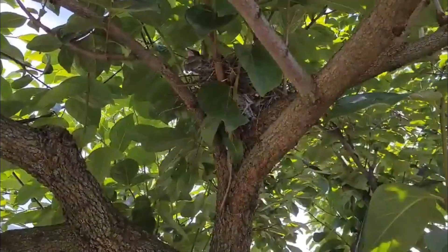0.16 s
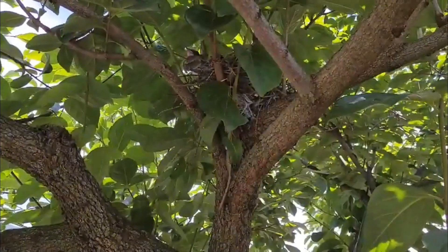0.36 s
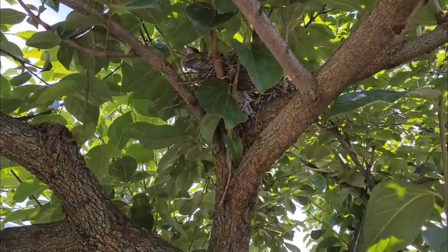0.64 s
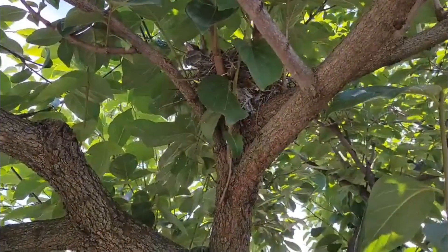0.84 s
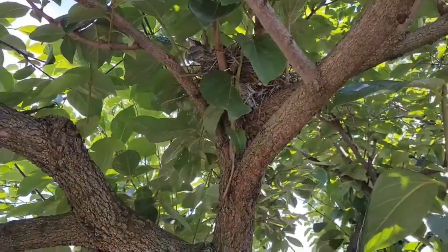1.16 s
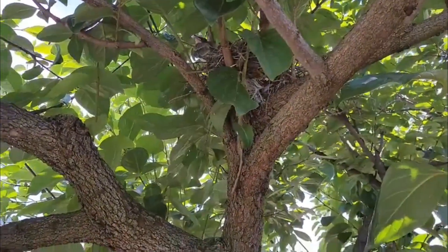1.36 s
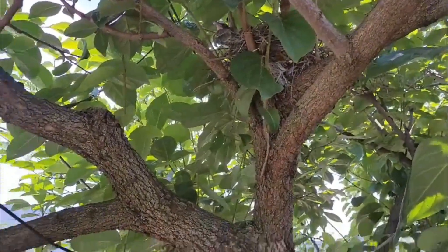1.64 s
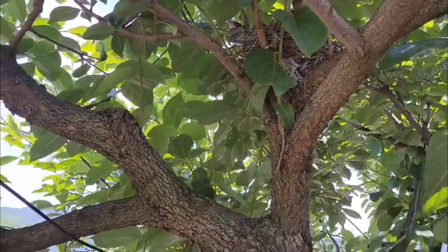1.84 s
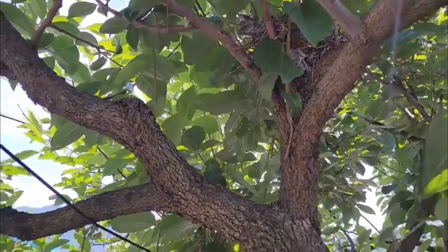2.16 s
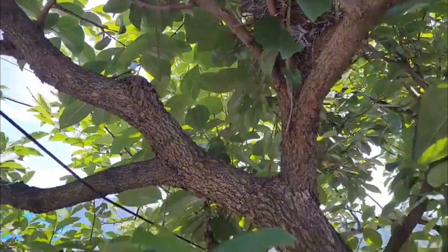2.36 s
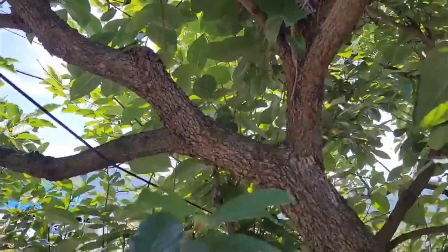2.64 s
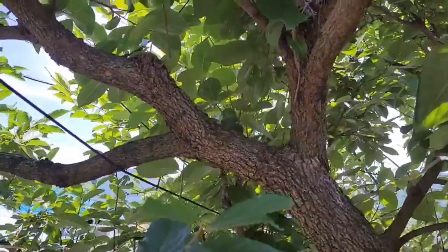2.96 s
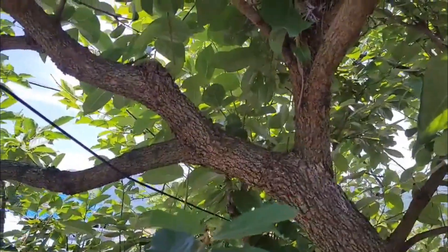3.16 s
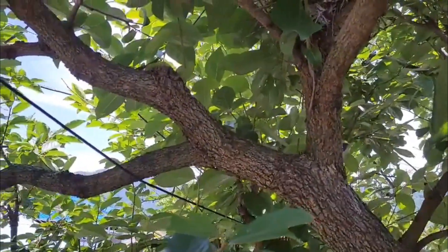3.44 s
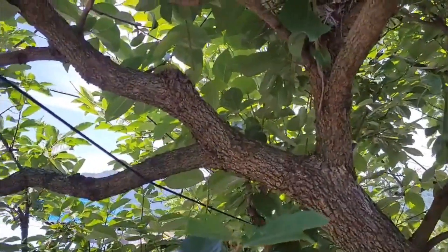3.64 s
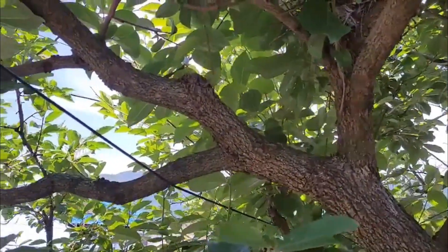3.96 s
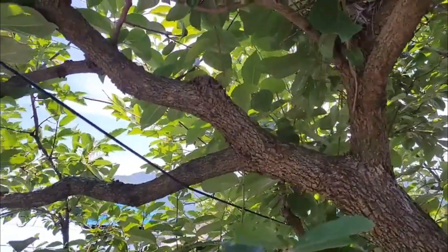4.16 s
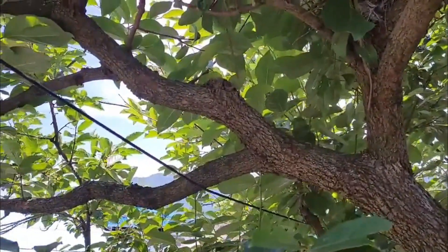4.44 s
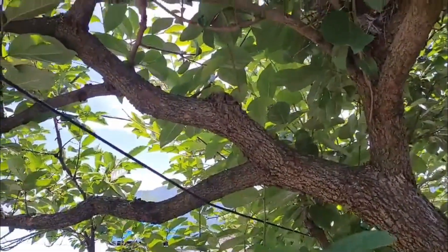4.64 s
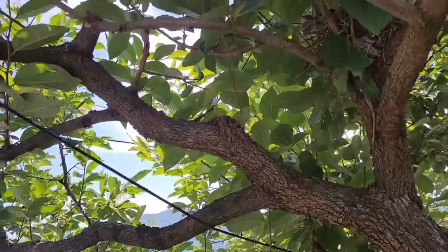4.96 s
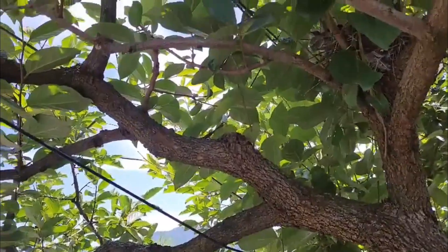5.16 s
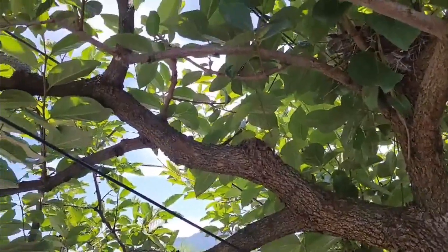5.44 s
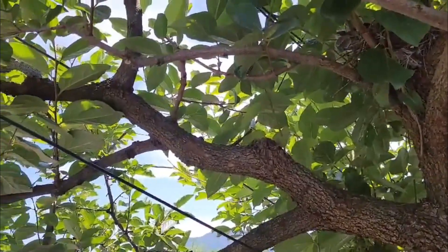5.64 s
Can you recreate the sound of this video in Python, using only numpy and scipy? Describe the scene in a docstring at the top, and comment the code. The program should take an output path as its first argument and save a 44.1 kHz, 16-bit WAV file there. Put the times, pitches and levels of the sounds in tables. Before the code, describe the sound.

A bird close by in a leafy tree gives two loud, harsh, squealing rasps, with faint insect hiss and small rustles behind.

```python
"""In a leafy tree, close by, a shrike gives two long, harsh rasps; the second comes in two pushes.
Each push is turbulent noise chopped into rapid puffs and rung by the throat: it snaps on, holds and fades,
and sliding narrow resonances make it squeal briefly. Delayed copies echo it from twigs and foliage.
Behind it are a steady insect hiss and a thin drone, both filtered noise, and faint chirps of gliding sines.
Shaped noise gives the low outdoor rumble, rustles, small ticks, rubs and handling bumps."""
import sys
import numpy as np
from scipy import signal
from scipy.fft import rfft, irfft, next_fast_len
from scipy.io import wavfile

SR = 44100
rng = np.random.default_rng(int(sys.argv[2]) if len(sys.argv) > 2 else 0)


def unload_wav(signal):
    """Save mono or channel-first audio to the path in sys.argv[1] as 16-bit WAV at rate SR, clipped to [-1, 1]."""
    wavfile.write(
        sys.argv[1],
        SR,
        np.round(np.clip(np.atleast_2d(signal).T, -1, 1) * 32767).astype(np.int16),
    )


N = 256203
TIME = np.arange(N) / SR  # t/s

# Spectra give relative level per Hz; pans give left minus right; likeness is the share of the left
# channel blended into the right (-1 to 1). Layer levels are nominal: later gains and shaping add to them.

# pushes of air: start t/s, length t/s, effort level/dB, swell rate/(dB/s), initial puff rate f/Hz
PUSHES = [(-.06, 0.91, -27.5, -1, 111), (2.387, 0.59, -27.5, 3.5, 107), (2.906, 0.42, -26, -7, 108)]
# spectra of the rasp's body, treble and low rattle: f/Hz, level/dB
BODY_SPECTRUM = [(1200, -70), (1700, -20.5), (2100, -6.5), (2600, -2), (3100, 1), (3800, 1), (4400, -1.5),
                 (4950, -4), (5400, -12), (6500, -62)]
TREBLE_SPECTRUM = [(4500, -47), (5400, 2), (6300, 1.5), (7200, 1.5), (8300, 0.5), (9300, 0.5),
                   (10200, -2.5), (11200, -0.5), (12200, 1), (13300, -2), (14300, -3), (15300, -18)]
RATTLE_SPECTRUM = [(500, -13), (750, -13), (930, -7), (1100, -6), (1230, -9), (1500, -3.5), (1750, -2),
                   (2300, -3.5)]
# fixed resonances of throat and beak: f/Hz, width f/Hz, lift level/dB
BEAK_RESONANCES = [(3100, 110, 1.5), (3390, 170, 1.5), (3620, 140, -2), (3870, 150, 2), (4910, 160, 2)]
# depth to which the puffs chop the air: t/s, depth/1 (0 to 1)
PUFF_DEPTH = [(.08, .38), (.16, .1), (.23, .3), (.31, .14), (.44, .18), (.57, .38), (.7, .1), (2.42, .18),
              (2.48, .38), (2.6, .48), (2.7, .24), (2.81, .38), (3.02, .08), (3.13, .28), (3.24, .08)]
# level curves of treble and low rattle: t/s, level/dB
TREBLE_LEVEL = [(0, -33), (.08, -31), (.35, -30.5), (.48, -31.5), (.55, -32), (.76, -35.5), (2.4, -28.5),
                (2.56, -31.5), (2.65, -28), (2.73, -31.5), (2.82, -28.5), (2.89, -32), (2.95, -29),
                (3.07, -29), (3.16, -31), (3.25, -34.5)]
RATTLE_LEVEL = [(0, -49), (.18, -49), (.5, -42.5), (.66, -43), (.78, -40), (2.4, -43.5), (2.7, -44),
                (2.87, -44), (2.94, -41.5), (3.02, -48.5), (3.25, -46.5)]
# the throat's main and upper moving resonances, one curve a rasp: t/s, f/Hz
THROAT_CURVES = [
    [(.08, 3700), (.33, 3250), (.52, 3870), (.61, 3140), (.756, 4260), (.8, 3400)],
    [(2.4, 3200), (2.54, 2980), (2.7, 3470), (2.884, 3970), (2.922, 2920), (2.98, 3600), (3.28, 3630)],
]
UPPER_CURVES = [
    [(.05, 8000), (.21, 8400), (.35, 8000), (.65, 8550)],
    [(2.42, 7900), (2.63, 8300), (2.72, 9200), (2.84, 9600), (2.95, 7100), (3.08, 7860), (3.25, 7760)],
]
# squeals: start t/s, length t/s, start f/Hz, end f/Hz, width f/Hz, level/dB, pan level/dB
SQUEAL_EVENTS = [(0, 0.14, 3800, 3900, 170, -26.5, -17), (-.03, 0.14, 4320, 4500, 200, -30.5, -6),
                 (0.102, 0.067, 4600, 4450, 200, -29.5, -2), (.14, .06, 1600, 1590, 140, -61, 0),
                 (0.188, 0.22, 3120, 3420, 250, -45, -6), (0.3, 0.11, 2390, 2330, 200, -34, 1),
                 (0.309, 0.074, 7500, 7700, 900, -36, 1), (0.336, 0.083, 4970, 4800, 220, -31, -8),
                 (0.493, 0.094, 3920, 3730, 300, -28.5, 0), (0.497, 0.11, 4530, 4150, 350, -30.5, 1),
                 (0.548, 0.081, 3000, 2960, 150, -29.5, -6), (0.693, 0.064, 4300, 4400, 300, -35, 2),
                 (2.387, 0.042, 3400, 3620, 450, -28.5, 2), (2.393, 0.036, 2950, 2760, 200, -32.5, 2),
                 (2.432, 0.22, 2850, 3150, 170, -32, 1), (2.433, 0.28, 8330, 8360, 260, -36.5, -8),
                 (2.394, .18, 7150, 7240, 300, -42, 6), (2.604, 0.23, 3270, 3320, 170, -28.5, 8),
                 (2.612, 0.26, 3850, 4150, 170, -30, 2), (2.645, 0.17, 4400, 4570, 400, -33.5, 4),
                 (2.659, 0.2, 9050, 9600, 1200, -38, 0), (2.783, 0.066, 3380, 3430, 220, -22.5, 4),
                 (2.786, 0.07, 6950, 6730, 500, -33.5, -1), (2.837, 0.048, 4750, 5000, 300, -28, -2),
                 (2.908, 0.067, 2600, 2730, 300, -28, 3), (2.887, 0.057, 2220, 2310, 300, -36.5, 7),
                 (2.925, 0.049, 3370, 3570, 200, -29.5, -10), (3.051, 0.038, 1500, 1560, 160, -54, -2),
                 (3.166, 0.054, 1710, 1680, 200, -48, 7), (3.241, 0.038, 4860, 4900, 220, -37, 0)]
# low ring under the rasps: start t/s, length t/s, level/dB
HOLLOW_RINGS = [(.7, .14, -51), (2.33, 0.9, -51.5)]
# stereo image of the bird: f/Hz, pan level/dB; then f/Hz, likeness/1
BIRD_LEAN = [(800, 0.5), (2400, 0.5), (3400, 1.5), (4200, 1), (5200, 3), (7500, -0.5), (8400, -2.5),
             (9500, -4), (11000, 1.5), (15000, -1)]
BIRD_LIKENESS = [(500, 0.19), (1000, 0.73), (1500, 0.051), (2100, 0.29), (3500, 0), (5000, 0.038),
                 (15000, 0)]
# far chirps of another bird: start t/s, length t/s, start f/Hz, end f/Hz, bow f/Hz, level/dB
CHIRP_EVENTS = [(3.352, .045, 4080, 3620, 0, -50), (3.404, .03, 4600, 5100, 0, -47),
                (3.425, 0.035, 5350, 5880, 80, -48), (3.52, 0.046, 4080, 4420, 60, -55),
                (4.19, .11, 3850, 4270, 380, -50)]
# insect hiss: spectrum f/Hz, level/dB; level curve t/s, level/dB; stereo image f/Hz, pan level/dB
HISS_SPECTRUM = [(1800, -92), (2700, -29.5), (3100, -8), (4200, -3.5), (5000, -5), (6600, -3.5),
                 (7700, 2.5), (8600, -2), (10000, -8.5), (12000, -15.5), (13500, -23), (15200, -37)]
HISS_LEVEL = [(0, -42.5), (1.1, -45.5), (2.3, -45), (3.5, -47), (4.3, -47), (4.6, -45.5)]
HISS_LEAN = [(2500, 2), (4200, 5), (6500, 4), (7600, 4.5), (8500, -4.5), (10000, 0.5), (12000, 3.5),
             (14000, 6)]
# one insect's thin note: t/s, level/dB
DRONE_LEVEL = [(1.4, -53.5), (2.1, -60), (3.5, -72), (5.81, -84)]
# outdoor rumble: spectrum f/Hz, level/dB; swells start t/s, length t/s, level/dB
AIR_SPECTRUM = [(12, -50), (20, -31), (54, 1), (145, -2), (235, 2), (338, -1.5), (584, -6), (807, -10),
                (929, -12), (1090, -15.5), (2040, -21), (2500, -20), (3250, -40), (5500, -120)]
AIR_GUSTS = [(.02, 0.24, -65.5), (.62, 0.15, -56.5), (.88, 0.093, -67), (1.7, 0.14, -65), (5.42, 0.31, -71)]
# stereo image of the surroundings: f/Hz, pan level/dB; then f/Hz, likeness/1
AIR_LEAN = [(30, 17), (70, 6), (140, 2), (1000, 0.5), (2500, 3.5)]
AIR_LIKENESS = [(30, 0.91), (80, 0.23), (220, 0.94), (500, 0.6), (900, -0.12), (1500, -0.13), (2200, 0.085)]
# small ticks and scuffs close by: start t/s, scuff level/dB, scuff decay by 60 dB t/s
TICK_EVENTS = [(2.042, -51, 0.091), (2.164, -44.5, 0.079), (3.369, -53, 0.14), (3.702, -43.5, 0.066),
               (4.264, -60, 0.055), (4.302, -55, 0.056), (4.342, -59, .06), (4.419, -48, .025),
               (5.087, -47, 0.085), (5.156, -52, .03), (5.454, -50.5, 0.062), (5.478, -55, .05),
               (5.55, -61, .06), (5.595, -58, .07)]
# spectrum shared by ticks and leaves: f/Hz, level/dB
TICK_SPECTRUM = [(150, -1), (400, 5.5), (900, 1.5), (1500, -1.5), (2200, 3), (3200, 10), (6000, -24),
                 (12000, -37)]
# soft rustles of leaves, dull rubs and handling bumps: start t/s, length t/s, level/dB
RUSTLE_EVENTS = [(.83, 0.24, -58), (1.74, 0.22, -64), (2.1, 0.16, -65), (3.33, 0.092, -56),
                 (4.67, 0.12, -63), (5.5, 0.15, -59)]
RUB_EVENTS = [(.87, 0.16, -61.5), (1.7, 0.34, -62.5), (4.24, 0.16, -70), (5.4, 0.2, -74)]
BUMP_EVENTS = [(0.886, 0.13, -63), (2.01, 0.27, -61.5), (2.494, 0.14, -56.5), (3.72, 0.084, -59.5),
               (4.257, 0.2, -53.5), (4.9, 0.13, -63)]
# spectrum of the bumps: f/Hz, level/dB
BUMP_SPECTRUM = [(25, -30), (50, 11), (75, 13), (110, 0), (250, -7.5), (600, -26)]

ATTACK_S, RELEASE_S = 0.023, 0.087
SNAP_S, SNAP_DB = 0.016, 0.5  # accent at the start of each push
SAG_HZ_PER_S = 6  # the puffs slow as the air runs out
RATE_WANDER, UNSTEADY_HZ = 0.0063, 8  # the puff rate wavers slightly
THROAT_FIRM, SQUEAL_FIRM = .5, .7  # 0 to 1
HOLLOW_HZ, HOLLOW_WIDTH_HZ = 998, 180
DRONE_HZ = 4175
AIR_DB, AIR_WANDER_DB, AIR_WANDER_HZ = -61, 1.5, 3.5
RUB_HZ, RUB_WIDTH_HZ = 485, 280
CRACK_DB, CRACK_T60_S = 4, 0.0094  # crack above scuff, and its decay
EDGE_HZ = 15450


def shrike(body_db=1.06, focus=0.5, throat_width_hz=700,
           upper_focus=0.36, upper_width_hz=1100, treble_pulsing=0.31):
    """Source-filter voice: pulsed turbulent air excites fixed and moving resonances of throat and beak."""
    knots_db, rattle_knots_db, knot_hz, knot_s = 2.3, 3.6, 200, .018
    effort, bright, low, flow = rasp_controls()
    throat_hz, = curves(np.vstack(THROAT_CURVES))
    upper_hz, = curves(np.vstack(UPPER_CURVES))

    body = colour(flow * noise(), BODY_SPECTRUM, BEAK_RESONANCES)
    body = body + focus * flow * resonate(noise(), throat_hz, throat_width_hz, THROAT_FIRM)
    treble = colour(flow ** treble_pulsing * noise(), TREBLE_SPECTRUM)  # pulses less deeply
    treble = treble + upper_focus * resonate(flow * noise(), upper_hz, upper_width_hz)
    rattle = colour(flow * noise(), RATTLE_SPECTRUM)

    voice = gain_of(body_db) * effort * patchy(body, knots_db, knot_hz, knot_s)
    voice = voice + bright * patchy(treble, knots_db, knot_hz, knot_s)
    voice = voice + low * patchy(rattle, rattle_knots_db, knot_hz, knot_s)
    voice = np.array([twigs(side) for side in voice])
    voice = voice + np.sqrt(flow) * squeals()
    ring = swells(HOLLOW_RINGS) * resonate(rng.standard_normal(N), HOLLOW_HZ, HOLLOW_WIDTH_HZ)
    return place(voice, BIRD_LEAN, BIRD_LIKENESS) + ring


def rasp_controls():
    """Breath envelope: each push snaps on, holds and fades; gives body, treble, rattle levels and airflow."""
    rows = np.array(PUSHES)
    gates = []
    for s, length in rows[:, :2]:
        rise, fall = (TIME - s) / ATTACK_S, (s + length - TIME) / RELEASE_S
        gates.append(np.clip(np.minimum(rise, fall), 0, 1))
    gate = np.max(gates, 0)
    current = np.maximum(np.searchsorted(rows[:, 0], TIME) - 1, 0)  # latest push begun
    start, length, effort_db, swell, rate = rows[current].T
    age = np.clip(TIME - start, 0, length)
    effort = gate * gain_of(effort_db + swell * age + SNAP_DB * np.exp(-age / SNAP_S))
    bright = gate * gain_of(curves(TREBLE_LEVEL)[0])
    low = gate * gain_of(curves(RATTLE_LEVEL)[0])
    unsteady = 1 + RATE_WANDER * wander(UNSTEADY_HZ)
    return effort, bright, low, puffs((rate - SAG_HZ_PER_S * age) * unsteady)


def puffs(rate):
    """Amplitude modulation by the syrinx: airflow swells and sinks each cycle, each puff a little different."""
    jitter, uneven_db, edge = .02, .7, .25
    depth = np.clip(curves(PUFF_DEPTH)[0], 0, 1)
    turns = np.cumsum(rate * (1 + jitter * wander(44.5))) / SR
    strength = gain_of(uneven_db * rng.standard_normal(N))[turns.astype(int)]
    # the second harmonic makes it open faster than it shuts
    shape = -np.cos(2 * np.pi * turns) - edge * np.sin(2 * np.pi * 2 * turns)
    return strength * (1 + depth * shape) / np.sqrt(1 + depth ** 2 / 2)


def squeals(squeal_db=0):
    """Superposition of all the squeals."""
    return gain_of(squeal_db) * sum(squeal(*row) for row in SQUEAL_EVENTS)


def squeal(s, length, start_hz, end_hz, width_hz, db, pan_db):
    """Gliding narrow resonance excited by noise, set at its own fixed place between left and right."""
    out, on = np.zeros((2, N)), (TIME > s) & (TIME < s + length)
    u = (TIME[on] - s) / length
    air = rng.standard_normal((2, SR))[:, :len(u)]
    lean = evened(gain_of([[pan_db / 2], [-pan_db / 2]]))
    tone = resonate(air, start_hz + (end_hz - start_hz) * u, width_hz, SQUEAL_FIRM)
    out[:, on] = lean * gain_of(db) * np.sin(np.pi * u) * tone
    return out


def twigs(x, nearest_s=0.000984, farthest_s=.0095, sway_s=.00007, sway_hz=3.6, count=6):
    """Comb filtering: close branches echo the rasp, and the comb drifts as the path delays vary."""
    echo = .24  # amplitude of each reflection
    out = x.copy()
    for delay in np.linspace(nearest_s, farthest_s, count):
        path = delay * rng.uniform(.9, 1.1) + sway_s * wander(sway_hz)
        out += echo * np.interp(TIME - path, TIME, x, left=0)
    return out / np.sqrt(1 + count * echo ** 2)


def far_chirps(waver=0.022, waver_hz=220):
    """Frequency modulation: short, wavering sines slide along a bowed line."""
    out, wobble = np.zeros(N), 1 + waver * wander(waver_hz)
    for s, length, start_hz, end_hz, bow_hz, db in CHIRP_EVENTS:
        swell = arch(s, length)
        glide = np.interp(TIME, [s, s + length], [start_hz, end_hz])
        hz = (glide + bow_hz * swell) * wobble
        out += gain_of(db) * swell * np.sqrt(2) * np.sin(2 * np.pi * np.cumsum(hz) / SR)
    return out


def foliage(x, t60=0.33, scatter_db=-17, dull_hz=4500):
    """Diffuse reflection: leaves and walls return a weak, dull, decaying tail."""
    t = TIME[:SR]
    tail = rng.standard_normal((2, SR)) * gain_of(-60 * t / t60) * (t > .006)
    low_pass = signal.butter(2, min(dull_hz, SR / 3), fs=SR, output="sos")
    tail = signal.sosfilt(low_pass, tail)
    tail = tail / np.linalg.norm(tail[0])
    return gain_of(scatter_db) * signal.fftconvolve(x, tail, axes=1)[:, :N]


def insects(hiss_db=3.0, shimmer_db=0.69, drone_width_hz=260):
    """Incoherent summation: a far chorus merges into shimmering noise; one resonant note stands out, then fades."""
    level_db = curves(HISS_LEVEL)[0] + hiss_db + shimmer_db * wander(31)
    chorus = colour(noise(), HISS_SPECTRUM) * gain_of(level_db)
    drone = resonate(noise(), DRONE_HZ, drone_width_hz) * gain_of(curves(DRONE_LEVEL)[0])
    return place(chorus + drone, HISS_LEAN)


def surroundings(tick_db=-6.0, rustle_db=-1, bump_db=0, stir_db=-72, stir_depth_db=4):
    """Spectral and envelope shaping of noise: drifting rumble, leaves, ticks, rubs and bumps."""
    air_level = gain_of(AIR_DB + AIR_WANDER_DB * wander(AIR_WANDER_HZ)) + swells(AIR_GUSTS)
    air = patchy(colour(noise(), AIR_SPECTRUM), depth_db=2.0, patch_hz=250, patch_s=.03) * air_level
    ticks = sum(tick(*row) for row in TICK_EVENTS)
    flicker_db = stir_depth_db * wander(11)
    rustles = gain_of(rustle_db + .5 * flicker_db) * swells(RUSTLE_EVENTS)
    leaves = rustles + gain_of(stir_db + flicker_db)
    scuff = patchy(colour(noise(), TICK_SPECTRUM), depth_db=5.0, patch_hz=597, patch_s=0.035)
    near = (gain_of(tick_db) * ticks + leaves) * scuff
    rubs = swells(RUB_EVENTS) * resonate(noise(), RUB_HZ, RUB_WIDTH_HZ)
    bumps = gain_of(bump_db) * swells(BUMP_EVENTS) * colour(noise(), BUMP_SPECTRUM)
    return place(air + near + rubs + bumps, AIR_LEAN, AIR_LIKENESS)


def tick(s, db, t60):
    """Exponential decay at two rates: the level of a dry crack over a short scuff."""
    out, on = np.zeros(N), (TIME >= s) & (TIME < s + t60)
    age = TIME[on] - s
    scuff = gain_of(db - 60 * age / t60)
    crack = gain_of(db + CRACK_DB - 60 * age / CRACK_T60_S)
    out[on] = scuff + crack
    return out


def patchy(x, depth_db, patch_hz, patch_s):
    """Random time-frequency gain: noise made coarser-grained by brief louder and softer patches; rms 1."""
    z = signal.stft(x, nperseg=256, noverlap=192)[2]
    hz, s = np.arange(-12, 13)[:, None] * SR / 256, np.arange(-60, 61) * 64 / SR
    blur = np.exp(-(2 * hz / patch_hz) ** 2 - (2 * s / patch_s) ** 2)
    field = evened(signal.fftconvolve(rng.standard_normal(z.shape[-2:]), blur, "same"))
    return evened(signal.istft(z * gain_of(depth_db * field), nperseg=256, noverlap=192)[1][..., :N])


def resonate(x, hz, width, firm=0):
    """Resonance along a frequency curve; firm (0-1) steadies it towards a self-sustained tone; rms 1."""
    turn = np.exp(2j * np.pi * np.cumsum(hz * np.ones(x.shape[-1])) / SR)
    r = np.exp(-np.pi * width / SR)
    # shift the resonance to 0 Hz, smooth with a double pole, then shift back
    ring = signal.lfilter([(1 - r) ** 2], [1, -2 * r, r * r], x / turn)
    if firm:
        power = abs(ring) ** 2
        ring = ring / (power + power.mean() / 10) ** (firm / 2)
    return evened((turn * ring).real)


def colour(x, spectrum, peaks=()):
    """Linear filtering: imposes a spectrum with steep ends and narrow resonances; rms 1."""
    size = next_fast_len(N + 4096)
    hz = np.fft.rfftfreq(size, 1 / SR)
    db = read(spectrum, hz)
    db = db + sum(lift / (1 + (2 * (hz - f) / width) ** 2) for f, width, lift in peaks)
    octaves_out = abs(np.log2((hz + 1) / np.clip(hz + 1, spectrum[0][0], spectrum[-1][0])))
    db = db - 30 * octaves_out  # dB per octave beyond the table
    return evened(irfft(rfft(x, size) * gain_of(db), size)[..., :N])


def place(pair, pan, likeness=((1000, 0),)):
    """Interchannel coherence and level difference: blends and leans two channels, band by band."""
    hz = np.fft.rfftfreq(N, 1 / SR)
    a, b = rfft(pair)
    same = np.clip(read(likeness, hz), -1, 1)
    lean = gain_of(read(pan, hz) / 2)
    left = a * lean
    right = (same * a + np.sqrt(1 - same ** 2) * b) / lean
    return irfft(np.array([left, right]), N)


def wander(rate_hz):
    """Low-pass random fluctuation of rms 1, falling away steeply above the rate."""
    size = next_fast_len(N, True)
    hz = np.fft.rfftfreq(size, 1 / SR)
    spectrum = rfft(rng.standard_normal(size)) / (1 + (hz / rate_hz) ** 4)
    return evened(irfft(spectrum, size)[:N])


def noise():
    """White noise, statistically independent in the two channels."""
    return rng.standard_normal((2, N))


def swells(rows):
    """Summed amplitude envelopes of soft events that rise and fall."""
    return sum(gain_of(db) * arch(s, length) for s, length, db in rows)


def arch(s, length):
    """Half-sine envelope: a smooth rise and fall."""
    out, on = np.zeros(N), (TIME > s) & (TIME < s + length)
    out[on] = np.sin(np.pi * (TIME[on] - s) / length)
    return out


def curves(rows):
    """Linear interpolation of each table column, sample by sample."""
    s, *columns = np.transpose(rows)
    return [np.interp(TIME, s, c) for c in columns]


def read(points, hz):
    """Interpolation of a spectrum table on a logarithmic frequency axis."""
    f, value = np.transpose(points)
    return np.interp(np.log(hz + 1), np.log(f), value)


def gain_of(db):
    """Decibel law: level to amplitude ratio."""
    return 10 ** (np.asarray(db) / 20)


def evened(x):
    """Power normalisation to rms 1."""
    return x / np.sqrt(np.mean(x ** 2) + 1e-20)


def scene():
    """Superposition: the birds and their reflections over the summer background."""
    birds = shrike() + np.array([far_chirps(), far_chirps()])
    return birds + foliage(birds) + insects() + surroundings()


def record(dry):
    """Band limitation by a linear-phase low-pass filter."""
    low_pass = signal.firwin(511, EDGE_HZ, window=("kaiser", 9), fs=SR)
    return signal.oaconvolve(dry, low_pass[None], "same")


dry = scene()
out = record(dry)
unload_wav(out)
```